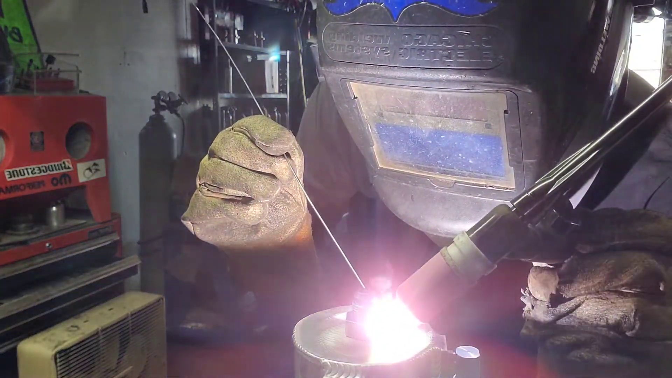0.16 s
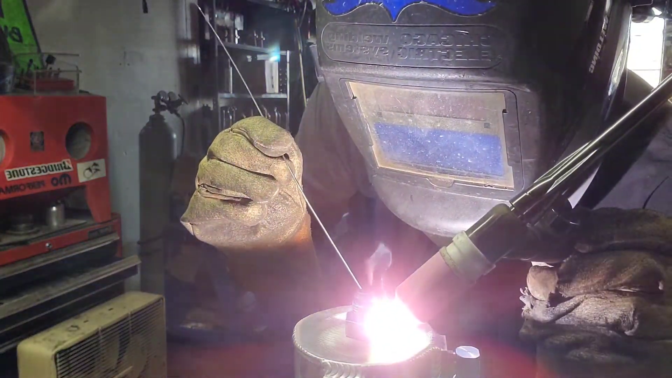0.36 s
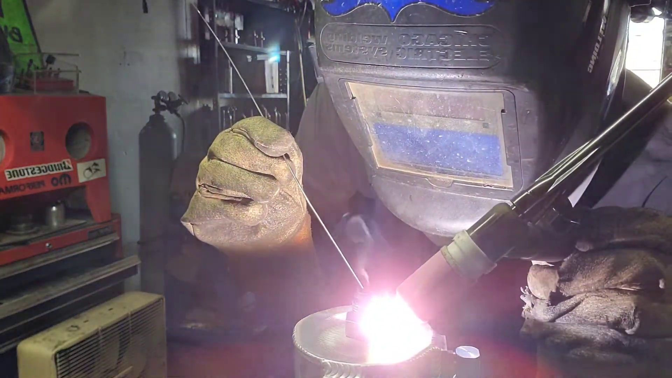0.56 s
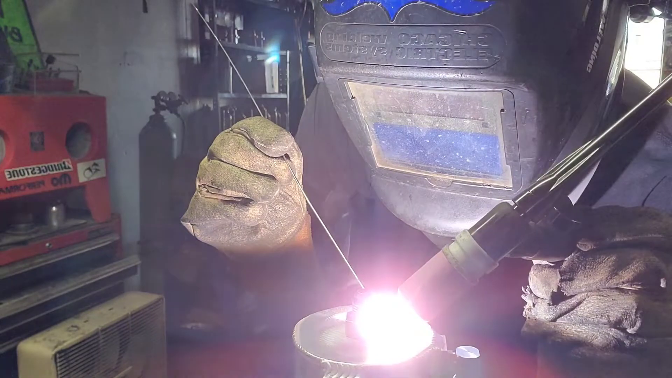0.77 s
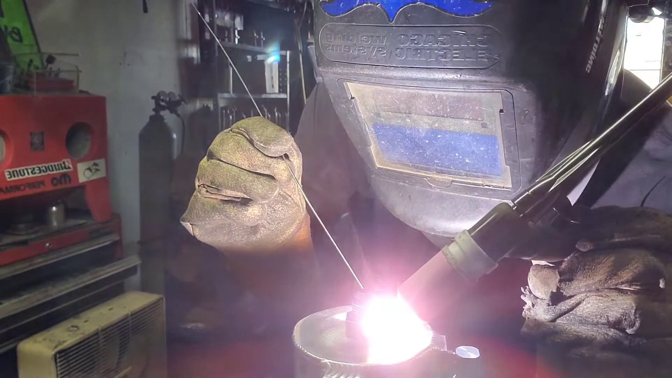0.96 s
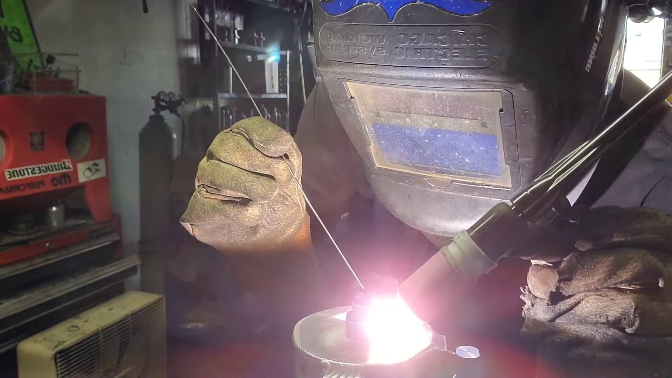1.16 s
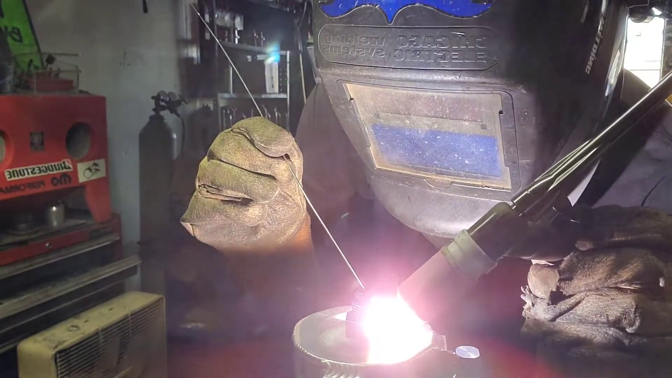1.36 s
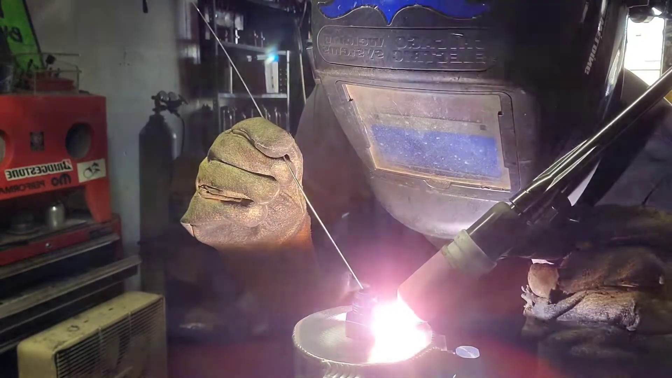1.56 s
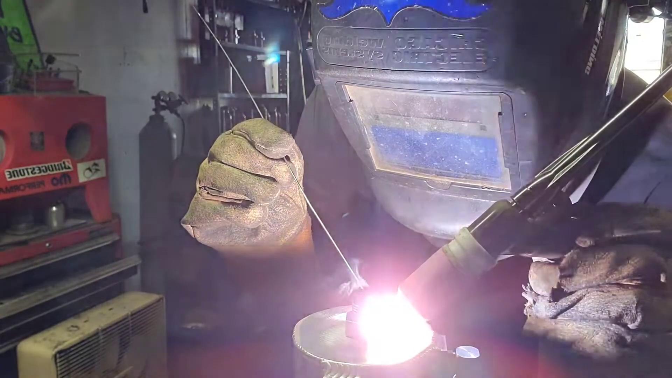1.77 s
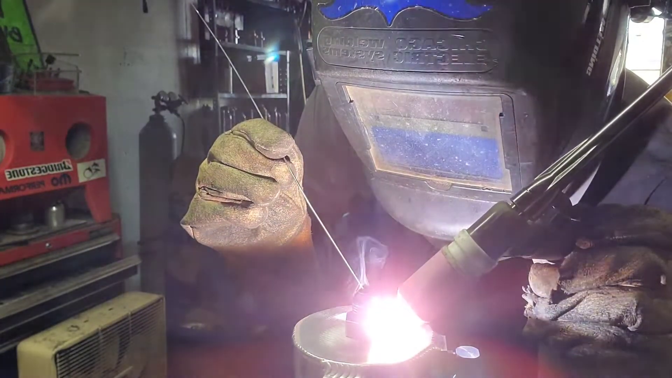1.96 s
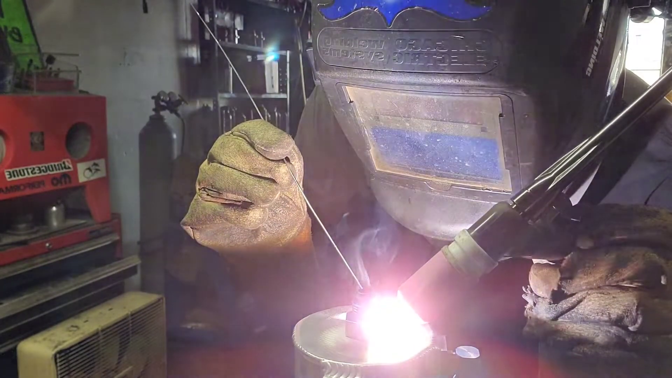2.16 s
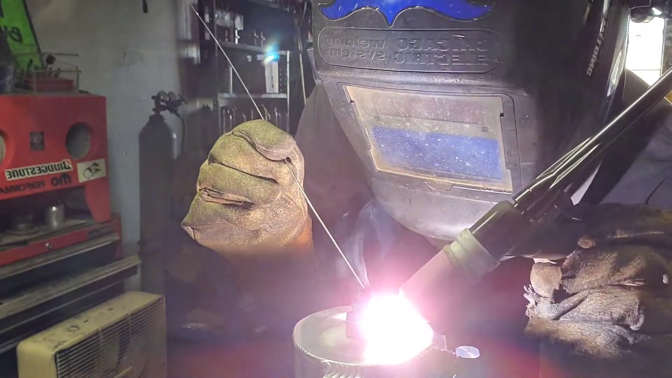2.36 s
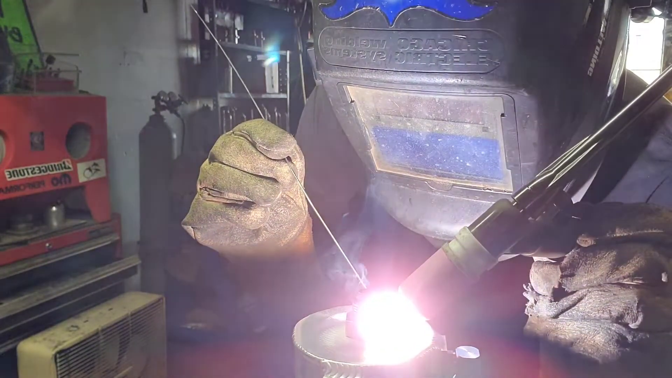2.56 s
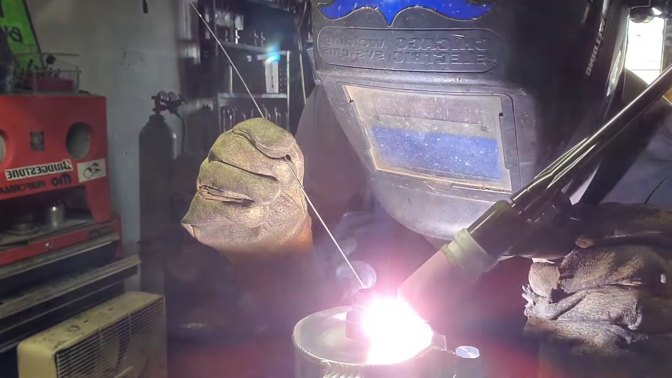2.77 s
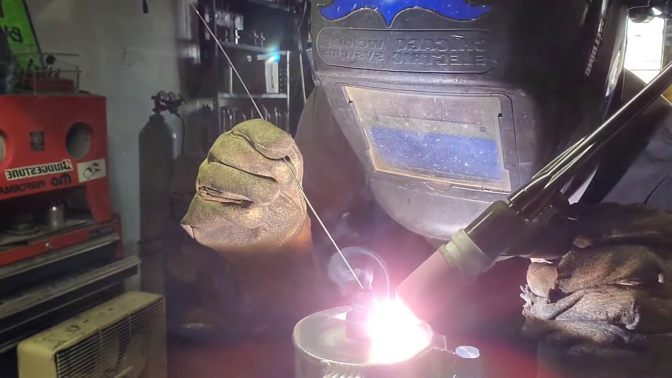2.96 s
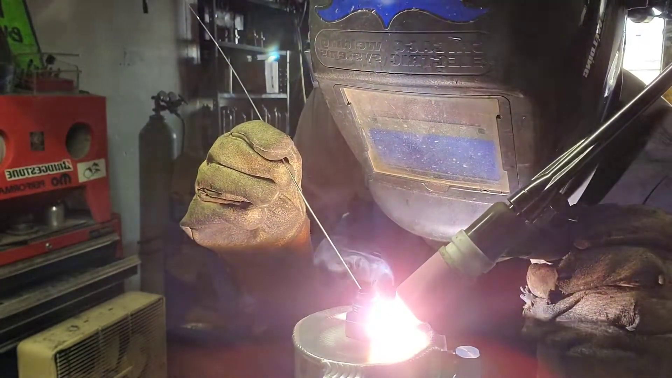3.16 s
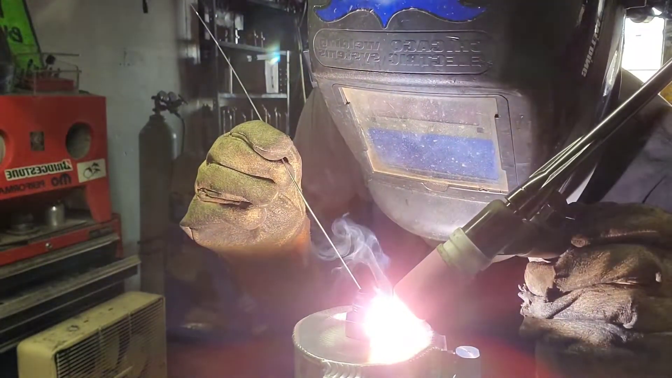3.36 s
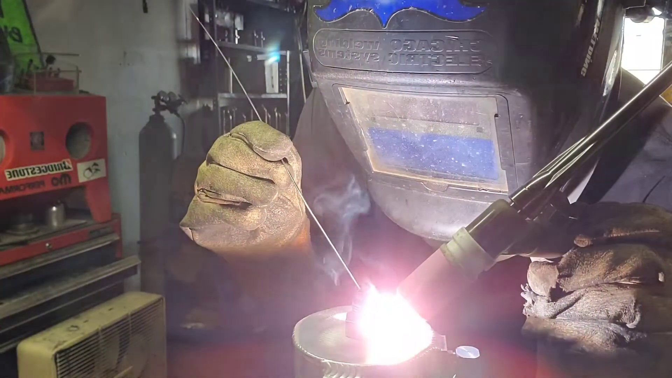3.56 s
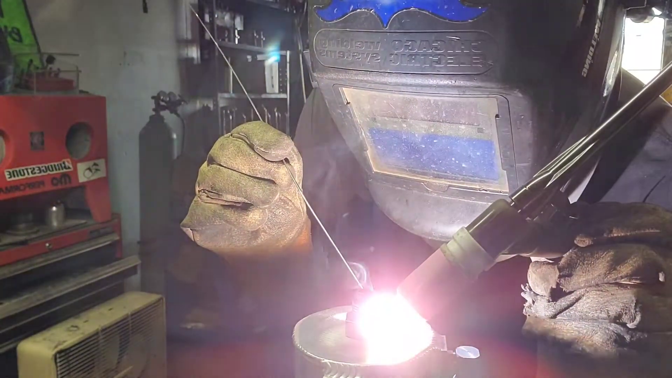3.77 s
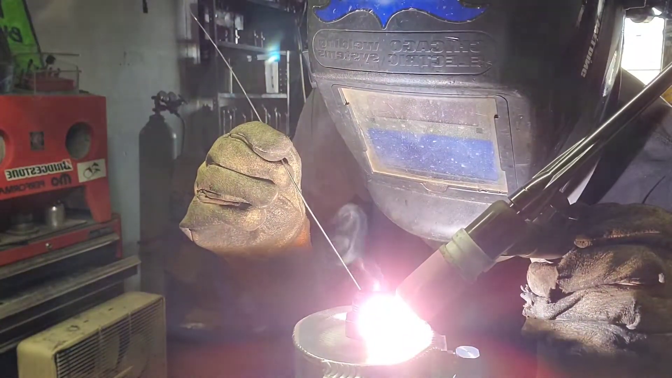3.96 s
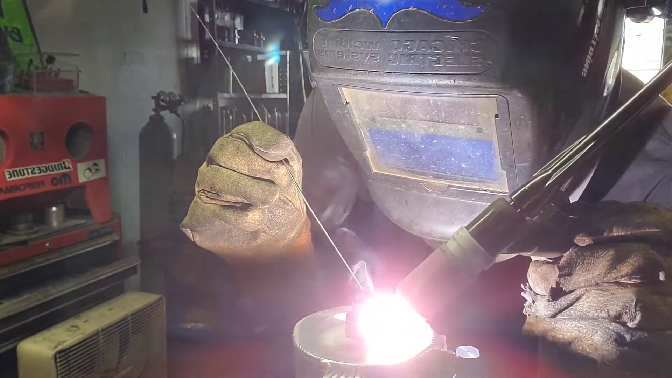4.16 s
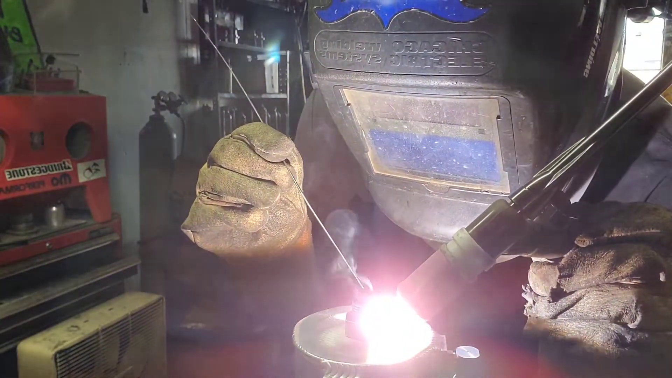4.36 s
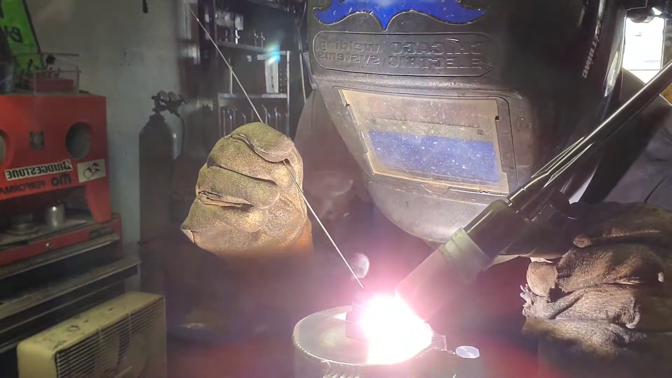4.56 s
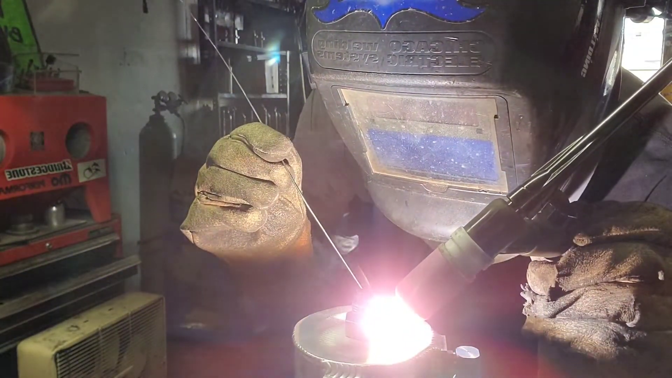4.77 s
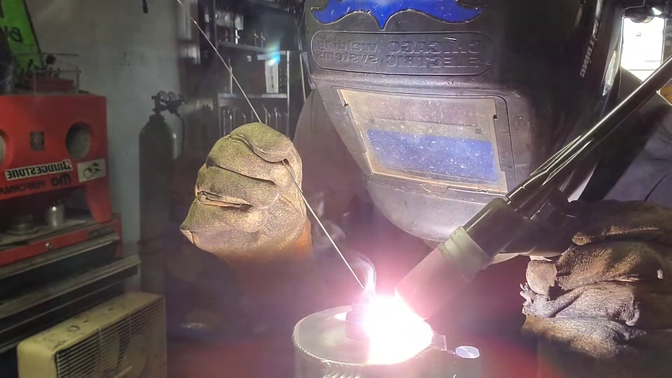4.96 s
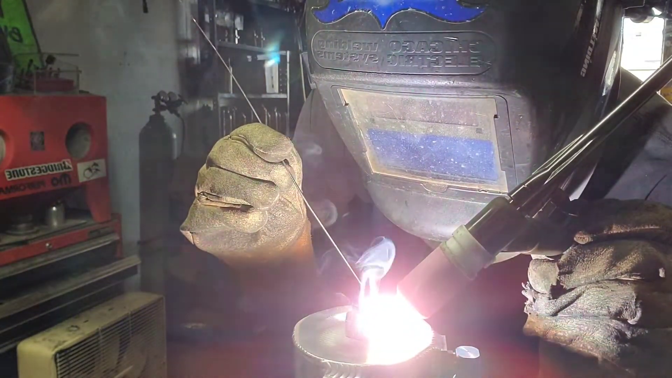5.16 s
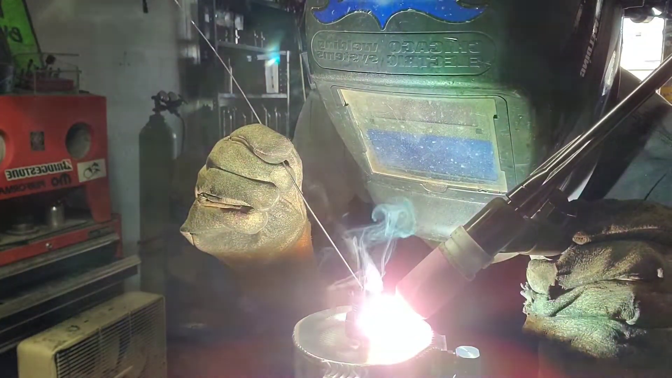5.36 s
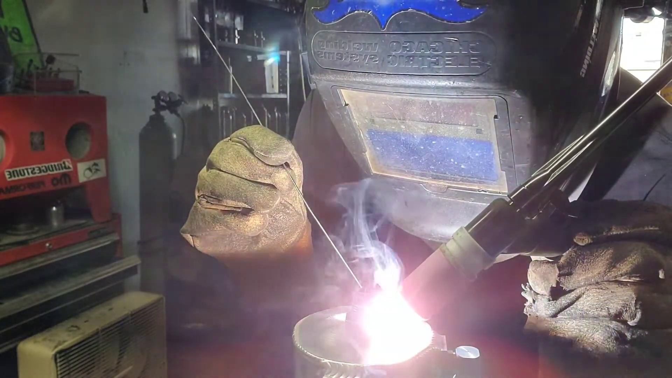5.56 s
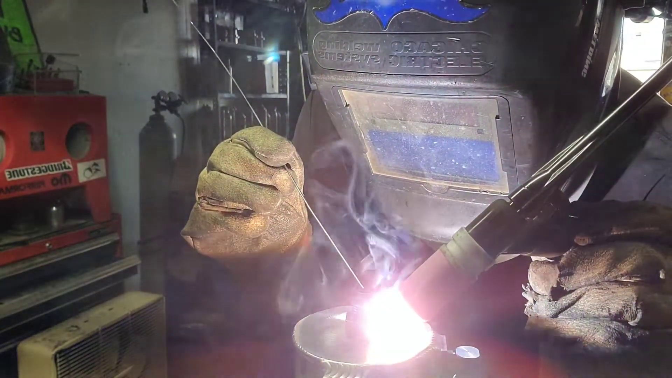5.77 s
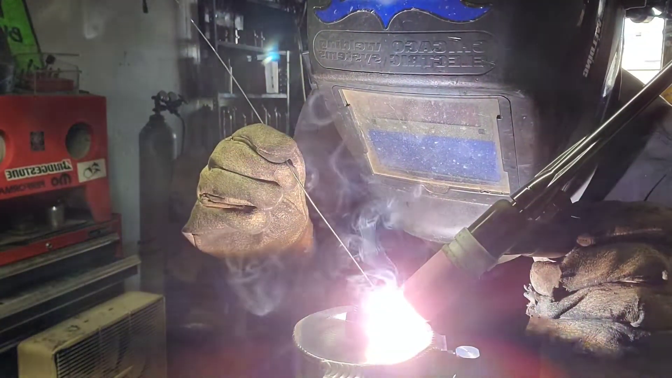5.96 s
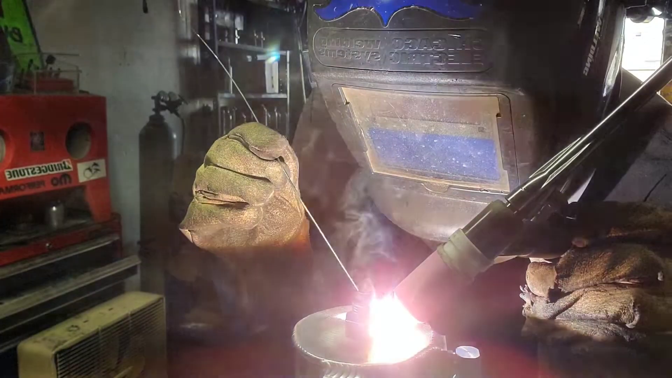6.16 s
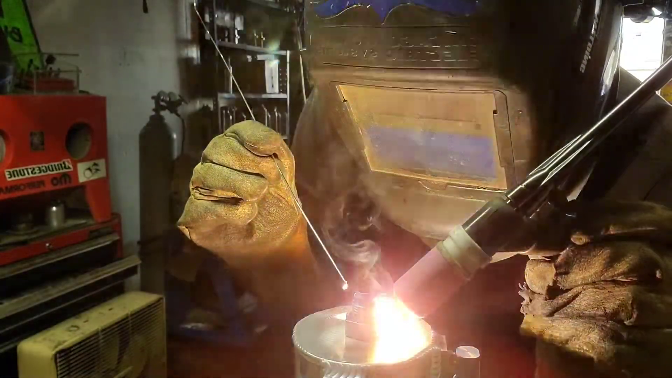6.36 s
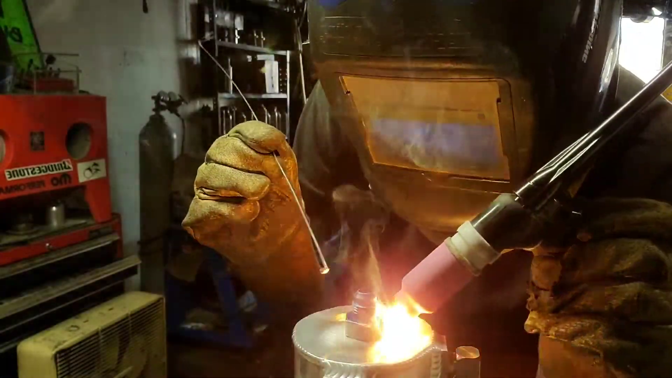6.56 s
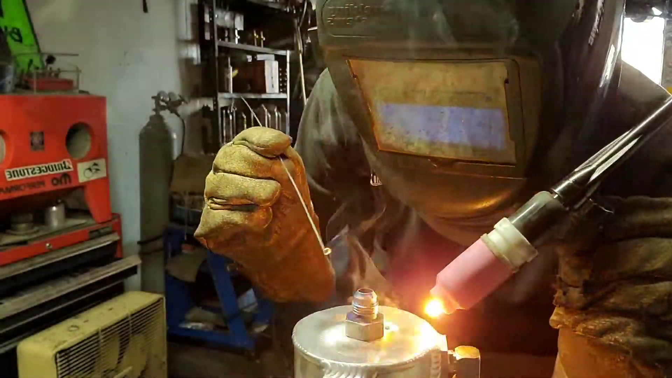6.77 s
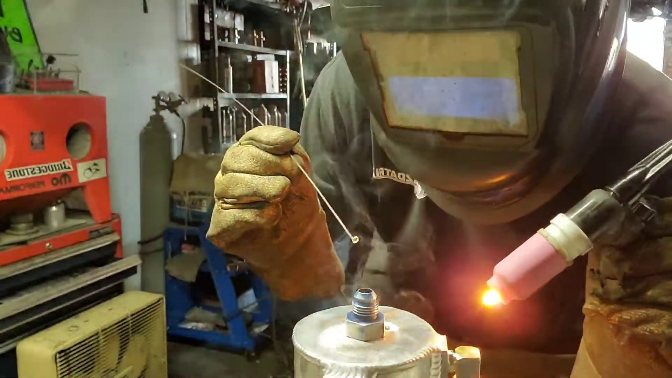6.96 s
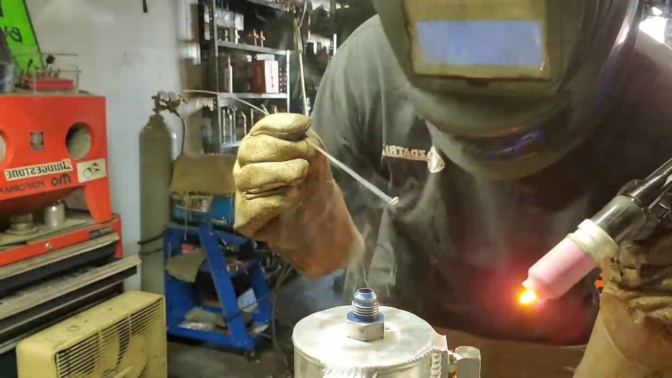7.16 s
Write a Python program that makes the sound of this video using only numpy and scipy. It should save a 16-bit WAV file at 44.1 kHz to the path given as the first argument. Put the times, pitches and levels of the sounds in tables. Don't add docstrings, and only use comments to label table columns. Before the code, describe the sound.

From 0 s a welding arc is already burning on a metal part, very close to a stereo pair in a small workshop. It is a continuous, hard-edged buzz at about 130 hertz, with ringing metallic overtones, a bright crackle on every cycle and wide sizzling plasma noise. A faint low hum swells and recedes beneath. The filler rod briefly chokes the buzz, most clearly around 1.6 and 2.1 s, with a barely audible soft low knock near 1.6 s, and again at 3.15 s. Spitting swells rasp brighter around 2.5, 3.1, 3.3, 3.8 and 5.35 s. From 5.6 to 5.95 s, hard snaps sputter in quick bursts, overloading the right side, strongest near 5.8 s. The tone weakens unevenly, flares at 6.4 s and stops abruptly at 6.45 s. A short echo dies, leaving quiet gas hiss with a fuzzy high whistle rising slightly until about 7 s.

```python
import sys
import numpy as np
from scipy import signal
from scipy.fft import rfft, irfft
from scipy.io import wavfile
from scipy.ndimage import uniform_filter1d

SR = 44100
rng = np.random.default_rng(int(sys.argv[2]) if len(sys.argv) > 2 else 0)


def put_to_file(sound):
    columns = np.atleast_2d(sound).T
    safe = np.clip(columns, -1, 1)
    whole_steps = np.round(safe * 32767)
    wavfile.write(sys.argv[1], SR, whole_steps.astype(np.int16))


def volts_from_db(level):
    exponent = np.asarray(level, float) / 20
    return 10 ** exponent


N = 317949
T = np.arange(N) / SR

CYCLE_HZ, STRIKE_S, OUT_S = 130.33, .0041, 6.452
REVERSE_SHARE = .4
POOL_DB, BITE_DB = -39, -28.5

# [t/s, pool fullness/dB, flip bite/dB]
BURN = [(0.0, -40, -30.5), (0.32, -42, -30.5), (0.5, -37.5, -29), (1.0, -35.5, -29.5), (1.55, -37, -27.5),
        (1.8, -39.5, -27.5), (2.4, -42, -28.5), (2.65, -36.5, -28), (2.95, -39.5, -27.5), (3.3, -43, -28.5),
        (3.8, -39, -27.5), (4.2, -36, -30), (4.55, -38, -28), (4.95, -38, -28.5), (5.1, -36.5, -26.5),
        (5.5, -39, -27.5), (6.05, -40.5, -30), (6.4, -45, -29)]
# [t/s, depth/dB, recovery/s]
ROD_CHOKES = [(0.74, 1, 0.019), (1.19, 2, .05), (1.62, 8.5, .08), (2.12, 8, 0.037), (3.15, 4.5, 0.03),
              (3.38, 1, 0.045), (4.99, 3.5, 0.052), (5.77, 6, 0.027), (5.95, 3, 0.016), (6.24, 4, 0.045),
              (6.31, 3.5, 0.028)]
# [t/s, level/dB, half length/s]
POOL_SPITS = [(0.857, 1.5, .05), (2.22, 2, .03), (2.49, 3, 0.049), (3.076, 2.5, .05), (3.317, 3.5, 0.035),
              (3.61, 1.5, 0.027), (3.836, 2.5, 0.072), (5.35, 3.5, 0.053), (5.698, 5.5, 0.055),
              (5.814, 5.5, .03), (5.9, 5.5, 0.042), (6.156, 5, .03)]
LAYER_FOLLOWS = {"drone": (0.13, 1, 0, 1.26, -0.84, 7), "ring": (-0.9, 0.82, 0.36, 1.12, .1, 15.5),
                 "rasp": (-3, 0.1, 0.66, 0.77, 1.15, 4.5), "crack": (10.5, .01, 1, 0.89, 0.15, -1)}
# [t/s, extra direct level/dB]
ARC_EXPOSED = [(0, 0.5), (2.5, 2.5), (3.9, 1.5), (4.2, 1), (5.0, 1), (5.95, 4), (6.25, 3), (6.4, 4.5)]
# [multiple of the cycle/1, level/dB]
PART_RING = [(1, -25.5), (2, -9), (3, -10), (4, -10), (5, -0.5), (6, -5.5), (7, -17), (8, -7.5), (9, -22),
             (10, -11.5), (11, -3.5), (12, -6), (13, -3.5), (14, -4), (15, -12.5), (16, -20), (17, -14),
             (18, -12), (19, -13), (20, -11), (21, -14.5), (22, -21.5)]
# [f/Hz, level/dB]
CRACK_SPECTRUM = [(1650, -52.5), (2800, -20), (3550, -18), (3930, -21.5), (4220, -13.5), (4700, -21.5),
                  (5390, -12), (7770, -21), (9710, -5), (10400, -11.5), (11800, 1.5), (14500, -1.5),
                  (15600, -1)]
# [f/Hz, level/dB per Hz]
SIZZLE_SPECTRUM = [(40, -17), (180, -21.5), (450, -18.5), (1100, -19), (1600, -7.5), (2600, -13),
                   (4600, -13), (8000, -11.5), (10000, -4.5), (12500, -1.5), (15500, -4)]
# [f/Hz, likeness/1]
SIZZLE_LIKENESS = [(60, 1), (1200, 1), (2000, 0.42), (3000, 0.16), (15000, 0.074)]
# [f/Hz, level/dB per Hz]
GAS_SPECTRUM = [(24, -47), (40, -27), (69, -12), (317, -41), (1220, -19), (1520, -9), (2840, -4.5),
                (3140, -14.5), (3560, -6), (4030, -18), (4680, -23), (5050, -16), (6980, -15),
                (9410, -22.5), (15500, -16)]
# [f/Hz, likeness/1]
GAS_LIKENESS = [(60, 0.97), (240, 0.89), (950, 0.88), (3770, 0.27), (15000, -0.096)]
# [middle t/s, half length/s, level/dB]
HUM_RISES = [
    (0.18, .08, -68),
    (0.75, 0.38, -62),
    (1.75, 0.59, -58),
    (3.3, 0.37, -60),
    (4.1, .4, -68),
    (5.8, 0.16, -59),
    (6.4, .2, -73),
]
# [t/s, peak level/dB, f/Hz, t60/s]
ROD_TOUCHES = [
    (1.576, -47, 200, 0.15),
]
# [start t/s, length/s, first strike/dB, right microphone overload/dB]
RESTRIKES = [
    (5.635, 0, -14, -17),
    (5.705, .032, -13, -16.5),
    (5.773, 0, -4, -14),
    (5.797, .032, -7, -17),
    (5.84, .009, -18, -19),
    (5.864, .032, -10, -27),
    (5.904, .024, -8, -15.5),
]
# [f/Hz, left minus right level/dB]
PAIR_TILT = [(60, 1.5), (130, -2), (290, 1), (640, 2), (1410, 1.5), (3100, 1.5), (6820, -0.5), (15000, 4)]


def evened(x):
    return x / np.sqrt(np.mean(x ** 2) + 1e-20)


def read(points, hz):
    f, value = np.transpose(points)
    return np.interp(np.log(hz + 1), np.log(f + 1), value)


def curve(rows, column):
    rows = np.array(rows)
    return np.interp(T, rows[:, 0], rows[:, column])


def bump(s, half_s):
    return np.exp(-((T - s) / half_s) ** 2)


def wander(hz, count):
    steps_s = np.arange(0, T[-1] + 1, .01)
    f = np.geomspace(.12, hz, 16)[:, None]
    phase = f * steps_s + rng.random((count, 16, 1))
    waves = np.sin(2 * np.pi * phase) / np.sqrt(f)
    return np.array([np.interp(T, steps_s, evened(w)) for w in waves.sum(1)])


def band(x, lo_hz, hi_hz):
    sos = signal.butter(4, [lo_hz, min(hi_hz, .49 * SR)], "bandpass", fs=SR, output="sos")
    return signal.sosfilt(sos, x)


def coloured(points):
    log_gain = np.log(volts_from_db(read(points, abs(np.fft.fftfreq(4096, 1 / SR)))))
    return np.fft.ifft(np.exp(np.conj(signal.hilbert(log_gain)))).real[:1024]


def clicks(s, size):
    at = np.asarray(s)[:, None] * SR
    index = np.floor(at).astype(int) + np.arange(-16, 17)
    pulses = size[:, None] * np.sinc(index - at) * np.hanning(33)
    out = np.zeros(N + 64)
    np.add.at(out, np.clip(index, 0, N + 63), pulses)
    return out[:N]


def noise(points, same_points, patchy_db):
    frames, hz = N // 256 + 5, np.fft.rfftfreq(1024, 1 / SR)
    a, b, c, d, patches = rng.standard_normal((frames, 513, 5)).T
    patches = evened(uniform_filter1d(uniform_filter1d(patches, 12, 0), 14, 1))
    same = np.clip(read(same_points, hz), -1, 1)[:, None]
    left = a + 1j * b
    right = same * left + np.sqrt(1 - same ** 2) * (c + 1j * d)
    z = np.array([left, right]) * volts_from_db(read(points, hz)[:, None] + patchy_db * patches)
    return evened(signal.istft(z, nperseg=1024, noverlap=768)[1][:, :N])


def echoes(near_t60_s, far_t60_s, far_db):
    length = SR // 3
    taps = np.zeros((2, length))
    at = np.arange(20, length - 20, 20) + rng.integers(0, 20, (2, (length - 21) // 20))
    np.put_along_axis(taps, at, rng.standard_normal(at.shape), 1)
    t = T[:length]
    taps *= volts_from_db(-60 * t / near_t60_s) + volts_from_db(far_db - 60 * t / far_t60_s)
    return taps / np.linalg.norm(taps, axis=1, keepdims=True)


def surroundings(x, direct_db, drift_hz):
    turn = 2 * np.pi * drift_hz * (T + 0.34 * wander(0.76, count=1)[0])
    out = volts_from_db(direct_db + curve(ARC_EXPOSED, 1)) * np.array([x, np.roll(x, 3)])
    for k in range(3):
        share = np.sqrt(2 / 3) * np.cos(turn + 2 * np.pi * k / 3)
        out += signal.oaconvolve((share * x)[None], echoes(0.06, 0.34, -18), axes=1)[:, :N]
    return out


def level_db(layer):
    offset_db, pool, bite, choke, spit, flare_db = LAYER_FOLLOWS[layer]
    choked_db, spat_db = np.zeros((2, N))
    for s, db, recovery_s in ROD_CHOKES:
        onset_s = 0.033
        choked_db += db * np.where(T < s, bump(s, onset_s), np.exp(-abs(T - s) / recovery_s))
    for s, db, half_s in POOL_SPITS:
        spat_db += db * bump(s, half_s)
    flare_s, rise_s = 6.41, 0.0073
    flare = .5 + .5 * np.tanh((T - flare_s) / rise_s)
    steady_db = pool * (curve(BURN, 1) - POOL_DB) + bite * (curve(BURN, 2) - BITE_DB)
    return POOL_DB + offset_db + steady_db - choke * choked_db + spit * spat_db + flare_db * flare


def by_band(x, rasp_db, crack_db):
    rasp = evened(band(x, 2660, 8100))
    crack = evened(band(x, 8940, 17940))
    return volts_from_db(level_db("rasp") + rasp_db) * rasp + volts_from_db(level_db("crack") + crack_db) * crack


def body():
    turns = (T - STRIKE_S) * CYCLE_HZ
    cycle_gain = volts_from_db(0.71 * rng.standard_normal(int(turns[-1]) + 2))
    uneven = cycle_gain[np.floor(turns + .3).astype(int)]
    drift = wander(5.0, count=len(PART_RING))
    chance = rng.standard_normal((len(PART_RING), 2, 2, 1))
    lag_s = np.array([[0], [3.4e-5]])
    smear = 0.83 / volts_from_db(curve(ARC_EXPOSED, 1))
    drone, ring = np.zeros((2, 2, N))
    for (k, db), slow, (side, both) in zip(PART_RING, drift, chance):
        if k < 10:
            target = drone
            edge = -2 * np.pi * k * REVERSE_SHARE - .6
        else:
            target = ring
            edge = 2.3 - 0.2 * (k - 10) + smear * both[0]
        phase = 2 * np.pi * k * (turns - CYCLE_HZ * lag_s) + edge
        wave = np.cos(phase + 0.0018 * k ** 2 * side + 0.29 * slow)
        target += volts_from_db(db + 1.62 * slow + 0.041 * k * side) * wave
    tone = volts_from_db(level_db("drone")) * evened(drone) + volts_from_db(level_db("ring") - 0.34) * evened(ring)
    return tone * uniform_filter1d(uneven, 40)


def cracks():
    strike_s = STRIKE_S + np.arange(round((OUT_S - STRIKE_S) * CYCLE_HZ) + 1) / CYCLE_HZ
    late, size = rng.standard_normal((len(strike_s), 2, 2)).T
    reverse_s = strike_s + REVERSE_SHARE / CYCLE_HZ
    train = clicks(strike_s + 1.5e-6 * late[0], volts_from_db(1.3 * size[0]))
    train -= clicks(reverse_s + 1.5e-6 * late[1], volts_from_db(-10.0 + 1.1 * size[1]))
    return by_band(signal.oaconvolve(train, coloured(CRACK_SPECTRUM))[:N], rasp_db=-1.0, crack_db=1.5)


def sizzle():
    flare = 1 + np.exp(-((T - STRIKE_S) * CYCLE_HZ % 1) / 0.17)
    hiss = noise(SIZZLE_SPECTRUM, SIZZLE_LIKENESS, patchy_db=3.5) * flare
    low = volts_from_db(0.44 * (level_db("ring") + 42.0) - 48.5) * evened(band(hiss, 37, 2560))
    return low + by_band(hiss, rasp_db=-1.5, crack_db=-8)


def gas():
    whistle_hz, rise_hz, settle_s, width_hz = 6340, 620, .17, 500
    cooling_s = np.maximum(T - OUT_S - .07, 0)
    hz = whistle_hz + rise_hz * (1 - np.exp(-cooling_s / settle_s))
    turn = np.exp(2j * np.pi * np.cumsum(hz) / SR)
    r = np.exp(-np.pi * width_hz / SR)
    fuzz = signal.lfilter([1 - r], [1, -r], rng.standard_normal((2, N)) / turn)
    whistle = (turn * fuzz).real
    flow = noise(GAS_SPECTRUM, GAS_LIKENESS, patchy_db=2.5) + volts_from_db(-7.5) * evened(whistle)
    return volts_from_db(-49.5 - 1.7 * np.maximum(T - OUT_S, 0)) * flow * volts_from_db([[.3], [-.3]])


def power_hum():
    level = volts_from_db(-81) + sum(volts_from_db(db) * bump(s, half_s) for s, half_s, db in HUM_RISES)
    hum = np.sqrt(2) * level * np.sin(np.pi * CYCLE_HZ * T + 0.88 * wander(6.0, count=1)[0])
    return hum * volts_from_db([[-.6], [.6]])


def rod_touches():
    out = np.zeros(N)
    for s, db, hz, t60_s in ROD_TOUCHES:
        t = np.maximum(T - s, 0)
        out += volts_from_db(db - 60 * t / t60_s) * np.sin(2 * np.pi * hz * t)
    return out * volts_from_db([[-.6], [.6]])


def sputter():
    after_db, spread_db = -29, 3
    cycles, peak_db, overload_db = [], [], []
    chance = rng.standard_normal((len(RESTRIKES), 2, 8))
    for (start_s, length_s, first_db, push_db), luck in zip(RESTRIKES, chance):
        k = np.arange(round(length_s * CYCLE_HZ) + 1)
        cycles += list(round((start_s - STRIKE_S) * CYCLE_HZ) + k)
        peak_db += list(np.where(k == 0, first_db, after_db + spread_db * luck[0, k]))
        overload_db += list(push_db + spread_db * luck[1, k])
    s = STRIKE_S + np.array(cycles) / CYCLE_HZ
    snap = coloured(CRACK_SPECTRUM)
    crack = signal.oaconvolve(clicks(s, volts_from_db(peak_db) * volts_from_db(-7)), snap / abs(snap).max())[:N]
    push = -np.hanning(14)
    overload = signal.oaconvolve(clicks(s + 7e-5, volts_from_db(overload_db)), push)[:N]
    return crack, overload


def scene():
    burning = np.clip((OUT_S - T) / 0.0033, 0, 1)
    crack, overload = sputter()
    direct_db = np.array([[-7.], [-3.]])
    bright = surroundings(cracks() * burning + crack, direct_db, drift_hz=.07)
    dull = (body() + sizzle()) * burning
    dull += volts_from_db(-9) * signal.oaconvolve(dull, echoes(0.08, 0.5, -8.5), axes=1)[:, :N]
    return bright + dull + overload * [[0], [1]] + gas() + power_hum() + rod_touches()


def roll_off(x):
    return signal.sosfilt(signal.butter(12, 16790, fs=SR, output="sos"), x)


def record(dry):
    edge_hz = 15620
    hz = np.fft.rfftfreq(N, 1 / SR)
    tilt = volts_from_db(np.outer([.5, -.5], read(PAIR_TILT, hz)))
    capsule = tilt / (1 + (hz / edge_hz) ** 300)
    return roll_off(irfft(rfft(dry) * capsule, N))


dry = scene()
out = record(dry)
put_to_file(out)
```